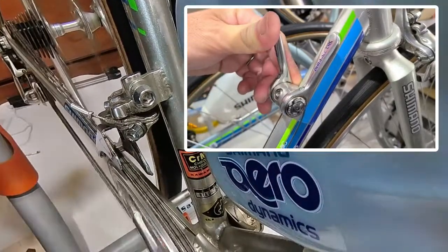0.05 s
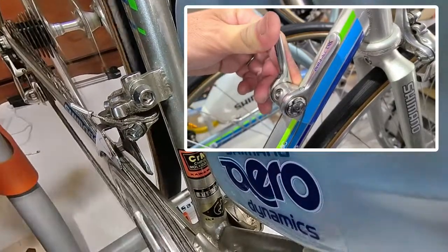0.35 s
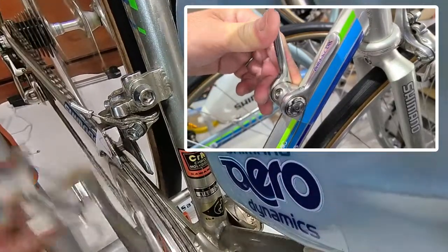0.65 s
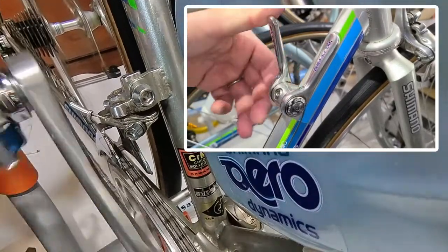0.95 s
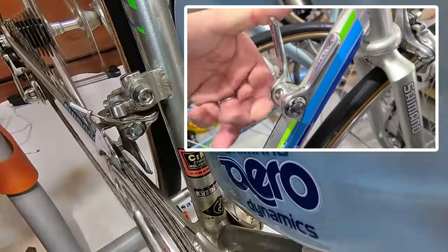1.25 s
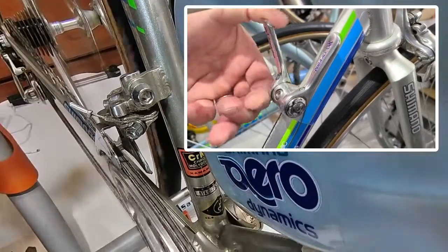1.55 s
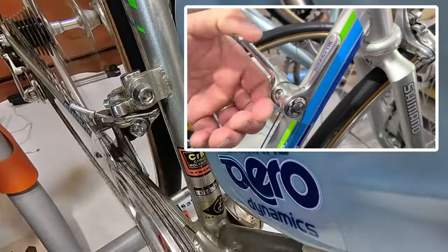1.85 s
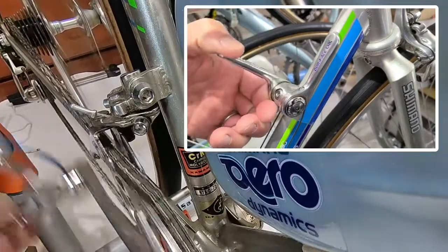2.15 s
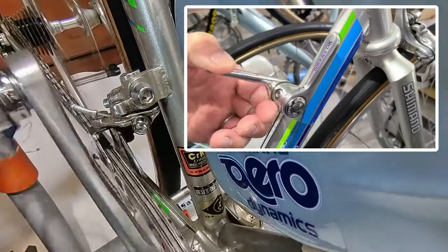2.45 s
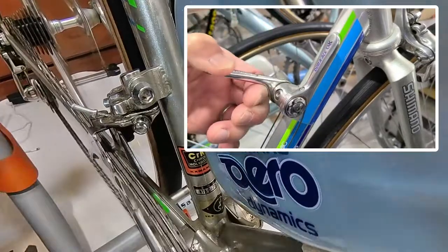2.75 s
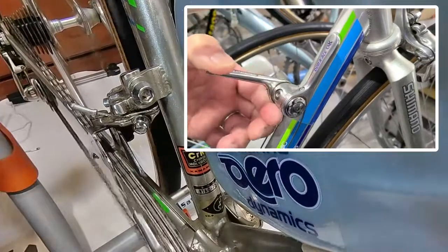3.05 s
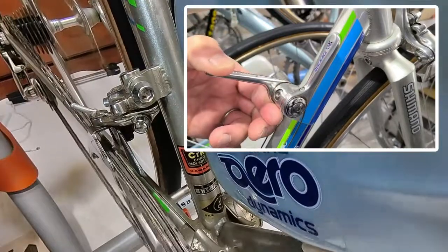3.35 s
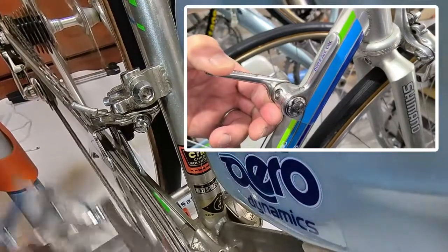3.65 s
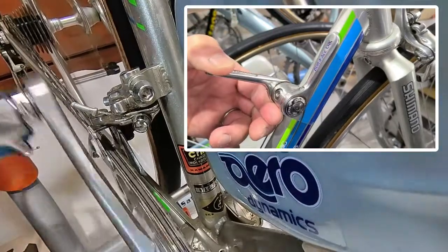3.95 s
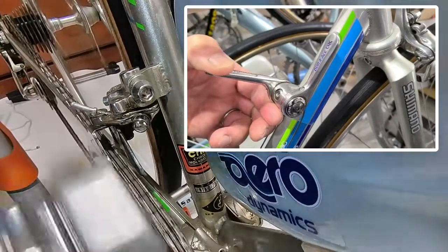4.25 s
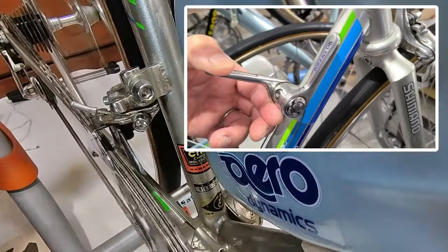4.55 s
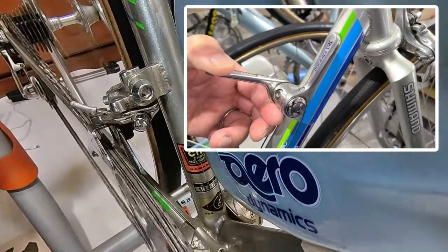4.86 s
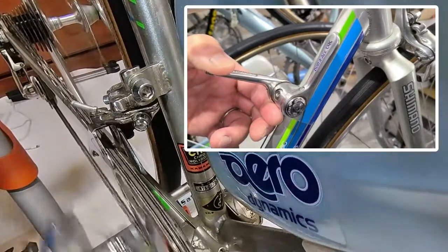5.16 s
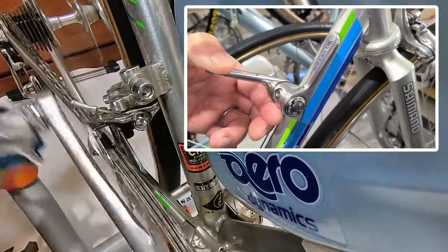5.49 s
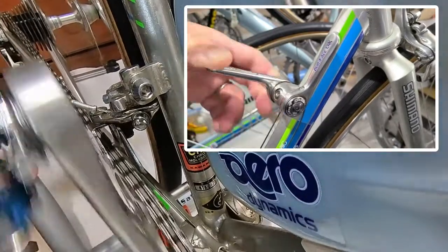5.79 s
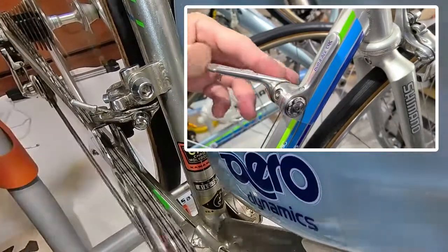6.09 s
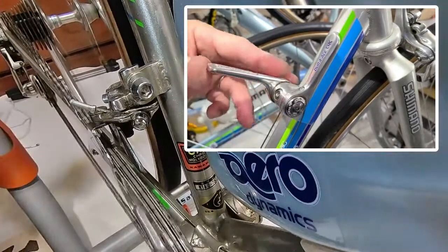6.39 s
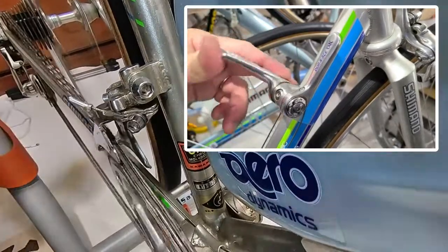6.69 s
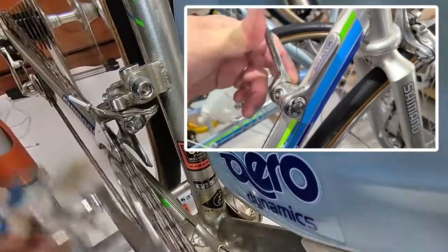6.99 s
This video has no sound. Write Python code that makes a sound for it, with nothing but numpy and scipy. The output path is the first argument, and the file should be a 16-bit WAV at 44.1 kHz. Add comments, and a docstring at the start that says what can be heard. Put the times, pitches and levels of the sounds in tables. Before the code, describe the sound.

Close, steady whirring of a pedalled bicycle chain, with metallic scrapes, clacks and one sharp snap as the derailleur shifts it.

```python
"""A bicycle is pedalled by hand in a repair stand in a small workshop, close to a two-port microphone.
From the start, chain rollers tick onto the teeth and keep the frame droning over the wheel's rumble.
After 2 s the front derailleur drags the chain upwards: it scrapes and clacks, and the frame jolts.
Near 3 s the chain seats on the big ring with a loud snap, then runs on with links grazing the cage.
Towards 7 s the derailleur pushes it off again in a second flurry of scrapes and clacks."""
import sys
import numpy as np
from scipy import signal
from scipy.fft import rfft, irfft, next_fast_len
from scipy.io import wavfile
from scipy.ndimage import uniform_filter1d, map_coordinates

SR = 44100
rng = np.random.default_rng(int(sys.argv[2]) if len(sys.argv) > 2 else 0)


def transcribe(u):
    """Save the signal u as a 16-bit wav file named by the first command-line argument.

    u: samples, shape (n,) or (channels, n), limited to [-1, 1]; the rate is SR.
    q: integer samples, one column per channel.
    """
    v = np.clip(np.atleast_2d(u).T, -1, 1)
    q = np.round(v * 32767).astype(np.int16)
    wavfile.write(sys.argv[1], SR, q)


N = 314433
TIME = np.arange(N) / SR

# Levels in the tables are relative: each source applies its own gain.
# spectrum of a roller meeting a tooth: (frequency [Hz], spectral level [dB])
ROLLER_SPECTRUM = [(2500, -26), (4000, -15), (5000, -11.5), (5900, 3), (6400, 3), (7600, -0.5),
                   (8100, -2.5), (8700, -12), (9400, -13), (10200, -9.5), (12300, -8), (13500, -13.5),
                   (16000, -9.5)]
# spectrum of the high sparkle of metal contact: (frequency [Hz], spectral level [dB])
SPARKLE_SPECTRUM = [(7000, -67), (8800, 4.5), (10200, 1), (12300, 9.5), (14000, -2), (15000, 7),
                    (16000, 1.5)]


def from_db(db):
    """Amplitude ratio of a level in decibels."""
    return 10 ** (np.asarray(db) / 20)


def unit_rms(x):
    """Normalisation to unit mean power."""
    return x / np.sqrt(np.mean(x ** 2) + 1e-20)


def in_time(curve):
    """Linear interpolation of a (time, value) curve at every sample."""
    return np.interp(TIME, *np.transpose(curve))


def at_hz(curve, hz):
    """Interpolation of a (frequency, value) curve on a logarithmic frequency axis."""
    frequencies, values = np.transpose(curve)
    return np.interp(np.log(hz + 1), np.log(frequencies), values)


def add(track, s, sound):
    """Superposition of a short stereo sound on a track at time s."""
    start = int(np.clip(s * SR, 0, N - 1))
    track[:, start:start + sound.shape[1]] += sound[:, :N - start]


def noise(spectrum, size=N, ripple_db=0, ripple_hz=220):
    """Partial coherence: coloured noise, less alike at the two ports towards the treble."""
    # likeness of the two ports: (frequency [Hz], correlation [1])
    likeness = [(50, 1), (250, 0.84), (500, 1), (900, 0.19), (1500, 0.6), (2500, 0.056), (6000, 0.11),
                (12000, 0.074)]
    padded = next_fast_len(size, real=True)
    hz = np.arange(padded // 2 + 1) * SR / padded
    # chance peaks and dips, one value every ripple_hz
    ripple = np.interp(hz / ripple_hz, np.arange(256), rng.standard_normal(256).clip(-2, 2))
    colour = from_db(at_hz(spectrum, hz) + ripple_db * ripple)
    mid, side = rfft(rng.standard_normal((2, padded))) * colour
    correlation = np.clip(at_hz(likeness, hz), -1, 1)
    ports = np.sqrt(1 + correlation) * mid + np.sqrt(1 - correlation) * side * [[1], [-1]]
    return unit_rms(irfft(ports, padded)[:, :size])


def decay(t60, room_db, rise_s, room_t60=0.4):
    """Exponential decay after a quick rise; the direct sound and the room's tail add in power."""
    t = TIME[:SR // 4]
    attack = 1 - np.exp(-t / rise_s)
    return attack * np.hypot(from_db(-60 * t / t60), from_db(room_db - 60 * t / room_t60))


def burst(spectrum, envelope, ripple_db=0):
    """An impact excites many overlapping modes, heard as coloured noise under an envelope."""
    return envelope * noise(spectrum, len(envelope), ripple_db)


def impulses(times, gains):
    """Impulsive excitation: one sample of force for each contact."""
    force = np.zeros(N)
    np.add.at(force, np.clip(np.round(times * SR).astype(int), 0, N - 1), gains)
    return force


def damped_mode(force, hz, t60):
    """Damped oscillator: a unit impulse starts a decaying sine of unit amplitude."""
    radius, angle = from_db(-60 / (t60 * SR)), 2 * np.pi * hz / SR
    return signal.lfilter([0, np.sin(angle)], [1, -2 * radius * np.cos(angle), radius ** 2], force + 1e-18)


def resonance(force, hz, width_hz):
    """Forced response of a resonator with unit gain at its peak."""
    return signal.lfilter(*signal.iirpeak(hz, hz / width_hz, fs=SR), force + 1e-18)


def waver(per_s, size=512):
    """Slow random modulation: per_s new values a second, joined by straight lines."""
    return np.interp(TIME * per_s, np.arange(size), rng.standard_normal(size).clip(-2, 2))


def swell(peak_s, db, rise_s, fall_s):
    """Exponential growth to a peak and exponential decay after it."""
    return from_db(db) * np.exp(-np.maximum((peak_s - TIME) / rise_s, (TIME - peak_s) / fall_s))


def swelling(base_db, peaks, rise_s, fall_s):
    """Power addition: the gain of a continuous sound with swells on top."""
    swell_power = sum(swell(s, db, rise_s, fall_s) ** 2 for s, db in peaks)
    return np.sqrt(from_db(base_db) ** 2 + swell_power)


def ticking(links, contacts, spectrum, envelope, scatter_db, jitter_s, ripple_db, variants=16):
    """Quasi-periodic impacts: each link makes its contacts, scattered in time, level and colour."""
    ticks = [burst(spectrum, envelope, ripple_db) for _ in range(variants)]
    link = np.arange(int(links[-1]))
    out = np.zeros((2, N))
    for phase, contact_db in contacts:
        times = np.interp(link + phase, links, TIME) + jitter_s * rng.standard_normal(len(link))
        levels_db = contact_db + scatter_db * rng.uniform(-1, 1, len(link))
        for s, db, k in zip(times, levels_db, rng.integers(variants, size=len(link))):
            add(out, s, from_db(db) * ticks[k])
    return unit_rms(out)


def rolling_links():
    """Meshing impacts at the link rate: bright roller ticks, duller plate rattle and a jingling cage."""
    # speed of the chain: (time [s], rate [links/s])
    speed = [(0, 30.8), (.85, 30.85), (1.5, 31.35), (3.2, 31.6), (4.2, 31.9), (4.8, 31.2), (5.4, 31.8),
             (6.0, 31.8), (6.6, 31.3), (7.13, 31.3)]
    # a link meets chainring, pulleys and sprocket in turn: (phase [link periods], level [dB])
    contacts = [(.22, 2), (.42, -2), (.55, 0.5), (.72, -2.5), (.92, -3.5)]
    # ticking of the running chain, louder on the big ring: (time [s], level [dB])
    run_level = [(0, -57.5), (1.1, -58.5), (1.6, -57.5), (2.7, -57.5), (3.2, -55), (4.1, -56.5), (4.7, -56),
                 (5.7, -56), (6.05, -60.5), (6.6, -54.5), (7.13, -53.5)]
    # links grazing the derailleur cage: (time [s], level [dB])
    graze_level = [(0, -85), (2.2, -78.5), (3.1, -81), (3.7, -63), (4.4, -69), (5.2, -60), (5.9, -71),
                   (7.13, -62)]
    # spectra of the side plates and of the cage: (frequency [Hz], spectral level [dB])
    plate_spectrum = [(400, -14), (760, 1.5), (900, -13.5), (1080, 1.5), (1380, -1), (1600, -3),
                      (2050, -5.5), (2400, -5), (2750, -1.5), (3050, -6.5), (3300, -3.5), (3700, -6.5),
                      (5000, -5.5), (9000, -57)]
    cage_spectrum = [(1500, -35), (2050, -29), (2170, -29), (2330, -11), (2750, -3), (3080, 7),
                     (3290, 12.5), (3480, -18), (4200, -37), (8000, -47)]
    links = np.cumsum(in_time(speed)) / SR
    tick = decay(t60=.028, room_db=-18, rise_s=.0004)
    rattle = decay(t60=.035, room_db=-15, rise_s=.0005)
    jingle = decay(t60=.073, room_db=-20, rise_s=.00034)
    rollers = ticking(links, contacts, ROLLER_SPECTRUM, tick, scatter_db=3.5, jitter_s=.0017, ripple_db=3)
    plates = ticking(links, contacts, plate_spectrum, rattle, scatter_db=8, jitter_s=.0012, ripple_db=4)
    cage = ticking(links, contacts[:1], cage_spectrum, jingle,
                   scatter_db=12.5, jitter_s=.00122, ripple_db=1)
    slack_db = 1.9 * waver(per_s=18)
    run_gain = from_db(in_time(run_level) + slack_db + 1.5)
    graze_gain = from_db(in_time(graze_level) - 3.5)
    return run_gain * (rollers + from_db(-2.5) * plates) + graze_gain * cage


def through_metal(contact):
    """Resonant colouring: contact noise plus the modes that it excites in chainring and cage."""
    # modes of chainring and cage: (frequency [Hz], bandwidth [Hz], level [dB])
    modes = [(1092, 17, -1), (1240, 26, -1), (1356, 39, 0.5), (1757, 32, 1.5), (2305, 16, -7.5),
             (2666, 65, -8.5), (3320, 37, -2), (4490, 43, -3), (7240, 19, -7)]
    return contact + sum(from_db(db) * resonance(contact, hz, width) for hz, width, db in modes)


def droning(modes, steady_s):
    """Forced vibration: rolling friction drives resonances, their power levelled over steady_s."""
    friction = noise([(30, 1.5), (1500, 1.0), (4000, -25)])   # (frequency [Hz], spectral level [dB])
    drone = sum((-1) ** k * from_db(db) * resonance(friction, hz, width)
                for k, (hz, width, db) in enumerate(modes))
    power = uniform_filter1d(np.mean(drone ** 2, axis=0), int(steady_s * SR) + 1)
    return drone / np.sqrt(power + 1e-20)


def drive_hum():
    """Structure-borne sound: the chain keeps chainring and frame humming, and each tug swells the hum."""
    # modes of the chainring and of the frame: (frequency [Hz], bandwidth [Hz], level [dB])
    chainring_modes = [(433, 32, -7), (474.2, 10.4, 3.5)]
    frame_modes = [(247, 17, 3), (307, 32, 3), (506, 103, -2.5), (610, 28, 0.5), (715, 38, -2),
                   (783, 42, -2)]
    # tugs on the chain: (peak time [s], level [dB])
    tugs = [(0.55, -48), (0.72, -47.5), (1.37, -48), (1.83, -46), (2.04, -39.5), (2.24, -42.5),
            (2.335, -35.5), (2.44, -41.5), (4.744, -42.5), (5.061, -39), (5.46, -47), (5.54, -51.5),
            (5.884, -41.5), (6.07, -44), (6.59, -48), (6.83, -45.5), (7.0, -43), (7.11, -45)]
    hum_db, frame_db = -54, -60
    ring_gain = swelling(hum_db + 3 * waver(per_s=14), tugs, rise_s=.016, fall_s=.033)
    frame_gain = from_db(frame_db) * (ring_gain / from_db(hum_db)) ** .71   # swells less than the ring
    chainring = ring_gain * droning(chainring_modes, steady_s=.092)
    frame = frame_gain * droning(frame_modes, steady_s=.19)
    return (chainring + frame) * from_db([[.8], [-.8]])


def wheel_rumble():
    """Low resonances of the spinning wheel, modulated in amplitude as the bicycle rocks in the stand."""
    # modes of the wheel: (frequency [Hz], bandwidth [Hz], level [dB])
    wheel_modes = [(60, 12.2, -3.5), (80, 15.8, 0), (117.8, 13, -5), (151, 34.3, -14)]
    # rumble of wheel and stand: (time [s], level [dB])
    rumble_level = [(0, -46.5), (1.1, -50), (2.3, -47.5), (3.2, -47), (3.9, -51), (4.8, -49), (5.3, -46),
                    (6.2, -52.5), (7.13, -45.5)]
    # rocking of the bicycle: (peak time [s], level [dB])
    rocks = [(0.15, -44), (0.35, -44), (1.32, -46), (4.35, -41.5), (6.11, -39), (6.47, -38.5)]
    base_db = in_time(rumble_level) + 2.5 * waver(per_s=8.4)
    gain = swelling(base_db, rocks, rise_s=.027, fall_s=.045)
    return gain * droning(wheel_modes, steady_s=.15) * from_db([[-.4], [.4]])


def room_air():
    """Stationary broadband noise: a faint background, strongest in the bass."""
    # background of the workshop: (frequency [Hz], spectral level [dB])
    air_spectrum = [(20, -7), (45, 0), (70, -4), (200, -7), (600, -14), (1000, -14.5), (3000, -21.5),
                    (7500, -38), (9000, -27.5), (16000, -38)]
    return from_db(-60) * noise(air_spectrum)


def chain_blows(clinks_per_s=4, slots=64):
    """Single, periodic and random impacts of the chain, as (time [s], level [dB], sparkle [dB])."""
    # chain striking teeth and cage: (time [s], level [dB], relative sparkle [dB])
    singles = [(0.078, -49.5, -22), (0.132, -49, -9), (0.451, -51, -15), (1.1377, -54.5, 8),
               (1.276, -53, 3), (1.47, -48.5, -17), (1.971, -47, -16), (1.9916, -43.5, -21),
               (2.0206, -45.5, -23), (2.148, -46, -22), (2.2023, -54, 8), (2.2336, -37, -5),
               (2.2474, -33.5, 6), (2.275, -42, -2), (2.2882, -42, -9), (2.3055, -37, -10),
               (2.3172, -36, -5), (2.3232, -36.5, 2), (2.4312, -43.5, -8), (2.4967, -48, -1),
               (3.4923, -50, -21), (3.682, -54, -18), (3.808, -49, -15), (4.4218, -56.5, -13),
               (5.2336, -45.5, -12), (6.309, -46.5, -24), (6.874, -42.5, -18), (6.9292, -40.5, -7),
               (6.9626, -37.5, -3.5), (6.9683, -32.5, -17), (6.9836, -35.5, -8), (6.995, -35, -7),
               (7.0676, -41.5, -3), (7.1039, -36, -12), (7.112, -27, -7)]
    # thin ticks before the shift back, then links catching on the cage:
    # (start [s], end [s], spacing [s], level [dB], relative sparkle [dB])
    runs = [(5.865, 6.23, .083, -53, 5.5), (6.605, 6.89, .0625, -42.5, -11)]
    regular = [(s, db, sparkle_db) for start, end, spacing, db, sparkle_db in runs
               for s in np.arange(start, end, spacing)]
    # the loose chain clinks once, at a random moment, in each time slot
    moment, softness = rng.random((slots, 2)).T
    times = (np.arange(slots) + moment) / clinks_per_s
    levels_db = -52 - 3 * (2 * softness - 1)
    clinks = [(s, db, -5) for s, db in zip(times, levels_db) if s < N / SR]
    return list(singles) + regular + clinks


def steel_ring(times, blows_db):
    """Free vibration of steel: each blow excites each mode with a random sign and strength per port."""
    # modes of chain and teeth: (frequency [Hz], level [dB], decay time T60 [s])
    modes = [(1090, -7, .08), (1358, -4, .1), (2290, -5, .07), (2640, -8, .08), (3530, -5, .06),
             (4441, -2, .07), (4732, -1, .08), (5407, 0, .08), (5809, -1, .1), (6138, -1, .07),
             (6378, 2, .09), (7381, -2, .05), (7983, -3, .04), (10250, -2, .06), (10950, 0, .06),
             (11888, -1, .07), (13620, 0, .06), (14893, 1, .06)]
    out = np.zeros((2, N))
    for hz, db, t60 in modes:
        for port in out:
            polarity, scatter = rng.uniform(-1, 1, (len(times), 2)).T
            gains = np.sign(polarity) * from_db(blows_db + db + 2 * scatter)
            port += damped_mode(impulses(times, gains), hz, t60)
    return out


def clacks_and_knocks():
    """Frequency-dependent damping: a clack's low notes outlast its crash; a knock has only low notes."""
    # spectra of the low body and of the crash of loose links: (frequency [Hz], spectral level [dB])
    body_spectrum = [(150, -7), (280, -4.5), (550, -0.5), (750, 2.5), (900, -10), (1090, -2), (1350, 1),
                     (1700, -12), (2500, -8), (3500, -26)]
    clank_spectrum = [(1000, -63), (1600, -2), (2300, 4.5), (3200, 5), (3900, 0.5), (4600, 1), (6300, 0.5),
                      (8000, 4), (8800, -29), (11000, -39)]
    # dull, hollow knocks: (time [s], level [dB])
    knocks = [(2.3176, -38), (3.1946, -46), (4.726, -46), (6.37, -50), (6.3918, -42)]
    hollow = decay(t60=.092, room_db=-24, rise_s=.0013)
    body = decay(t60=.08, room_db=-17, rise_s=.001)
    contact = decay(t60=.022, room_db=-40, rise_s=.0002)
    clank = decay(t60=.055, room_db=-22, rise_s=.0003)
    sparkle = decay(t60=.042, room_db=-25, rise_s=.0003)
    out = np.zeros((2, N))
    for s, db in knocks:
        add(out, s, from_db(db + 6) * burst(body_spectrum, hollow, ripple_db=.5))
    blows = chain_blows()
    for s, db, sparkle_db in blows:
        parts = [(body_spectrum, body, -4), (ROLLER_SPECTRUM, contact, -.6),
                 (clank_spectrum, clank, 3.5), (SPARKLE_SPECTRUM, sparkle, sparkle_db + 3)]
        for spectrum, envelope, part_db in parts:
            add(out, s, from_db(db + part_db) * burst(spectrum, envelope, ripple_db=.5))
    times, levels_db, _ = np.transpose(blows)
    return out + steel_ring(times, levels_db - 20)


def scraping(slips_per_s=480, spread_db=7, slip_s=.0021):
    """Stick-slip friction: side plates crunch on the cage in tiny, uneven slips during each rub."""
    # the chain is pressed sideways against cage and teeth:
    # (peak time [s], level [dB], relative sparkle [dB], rise [s], fall [s])
    rubs = [(2.024, -37.5, -27, 0.031, 0.046), (2.17, -46.5, -20, 0.037, 0.035),
            (2.247, -36.5, -7.5, 0.014, 0.065), (2.322, -46.5, 0, 0.017, 0.024), (6.8, -50, -20, .13, 0.11),
            (6.98, -40.5, -8, 0.011, 0.029), (7.117, -34.5, -10, 0.015, .03)]
    # spectrum of the gritty friction: (frequency [Hz], spectral level [dB])
    grit_spectrum = [(200, 2), (550, 4.5), (900, 5.5), (1300, 8.5), (1700, 4), (2170, 7.5), (2500, 6),
                     (3100, 5), (3600, -0.5), (4400, -4), (5500, -14), (7500, -10), (9000, -19.5)]
    slips = (rng.random(N) < slips_per_s / SR) * from_db(-spread_db * rng.random(N))
    slip_power = signal.lfilter([1], [1, -np.exp(-1 / (slip_s * SR))], slips ** 2 + 1e-18)
    grain = unit_rms(np.sqrt(slip_power))
    grit = noise(grit_spectrum, ripple_db=6, ripple_hz=60)
    sparkle = noise(SPARKLE_SPECTRUM)
    return grain * sum(swell(s, db, rise_s, fall_s) * (grit + from_db(sparkle_db) * sparkle)
                       for s, db, sparkle_db, rise_s, fall_s in rubs)


def frame_jolts(contact_s=.004):
    """A long contact time softens each blow, which sets the low modes of the frame swaying."""
    # jolts of the frame in the stand: (time [s], level [dB])
    jolts = [(2.278, -29), (2.312, -31), (2.331, -24.5), (2.350, -28), (2.988, -32.5), (6.972, -39),
             (7.113, -44)]
    # sway modes of the frame: (frequency [Hz], level [dB], decay time T60 [s])
    modes = [(63, -5, .2), (88, -8, .16), (120, -10, .12), (160, -7, .12), (225, -6, .13), (292, -7, .22)]
    times, levels_db = np.transpose(jolts)
    push = signal.windows.hann(int(contact_s * SR) + 3)
    force = signal.lfilter(push / push.sum(), [1], impulses(times, from_db(levels_db)))
    return sum((-1) ** k * from_db(db) * damped_mode(force, hz, t60)
               for k, (hz, db, t60) in enumerate(modes))


def seating_snap():
    """Hard impact of the taut chain on the big ring: a crack, shaken links, ringing steel and a knock."""
    # the chain skids off a tooth tip, slams home and rebounds: (time [s], level [dB])
    impacts = [(2.978, -34), (2.981, -22), (2.9842, -11), (3.0507, -30)]
    # spectra of the crack and of the knock in the frame: (frequency [Hz], spectral level [dB])
    crack_spectrum = [(200, -35), (700, -4.5), (1000, -13), (1350, 5), (1800, -8), (2400, 0.5),
                      (3900, -4.5), (4600, 3), (6300, 3), (7600, 1), (9000, -5.5), (10300, 3),
                      (12500, -0.5), (15000, 2), (16000, -9)]
    knock_spectrum = [(60, -1), (170, -21), (240, -4), (310, 5), (400, -16), (700, -11), (900, -16),
                      (2000, -45)]
    crack = decay(t60=.036, room_db=-36, rise_s=.0002)
    shaken_links = from_db(-11) * decay(t60=.11, room_db=-30, rise_s=.001)
    knock = decay(t60=.27, room_db=-11, rise_s=.0028)
    out = np.zeros((2, N))
    for s, db in impacts:
        add(out, s, from_db(db + .5) * burst(crack_spectrum, np.hypot(crack, shaken_links), ripple_db=2))
        add(out, s, from_db(db - 26) * burst(knock_spectrum, knock))
    times, levels_db = np.transpose(impacts)
    return (out + steel_ring(times, levels_db - 18.5)) * from_db([[.4], [-.4]])


def scene(port_delay_s=.000309):
    """Superposition with a path difference: the bicycle's sound reaches the left port first."""
    contact = rolling_links() + scraping() + clacks_and_knocks()
    chain = through_metal(contact) * from_db([[1], [-1]])   # left port up, right port down
    left, right = chain + drive_hum() + wheel_rumble() + seating_snap() + frame_jolts()
    right = map_coordinates(right, [np.arange(N) - port_delay_s * SR], order=3, mode="nearest")
    return np.array([left, right]) + room_air()


def record(dry):
    """Band limiting: a steep elliptic low-pass filter removes the highest treble."""
    cutoff_hz = 15800
    return signal.sosfilt(signal.ellip(12, .2, 90, cutoff_hz, fs=SR, output="sos"), dry)


dry = scene()
out = record(dry)
transcribe(out)
```